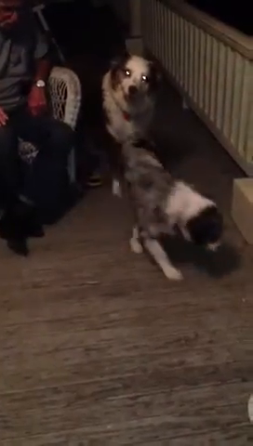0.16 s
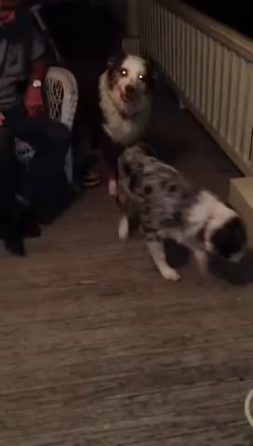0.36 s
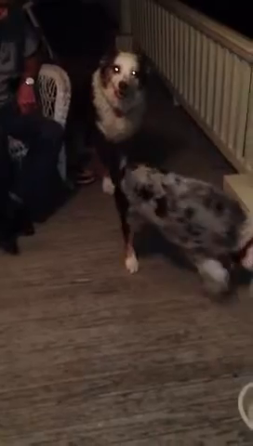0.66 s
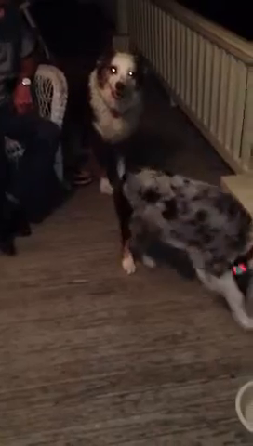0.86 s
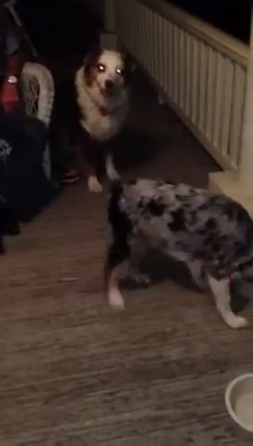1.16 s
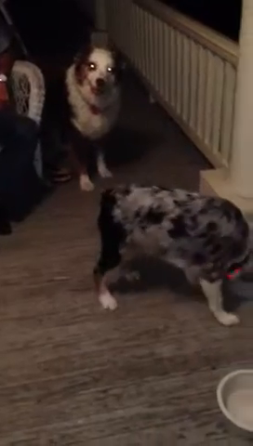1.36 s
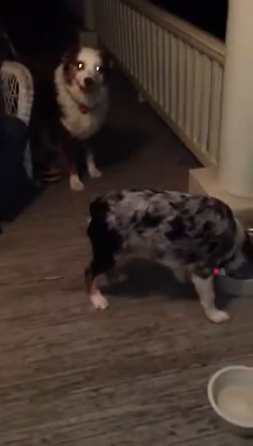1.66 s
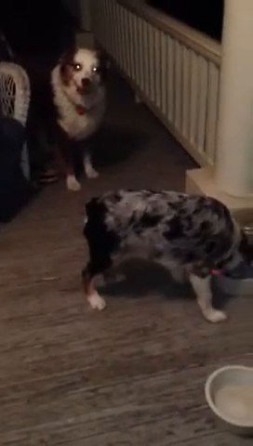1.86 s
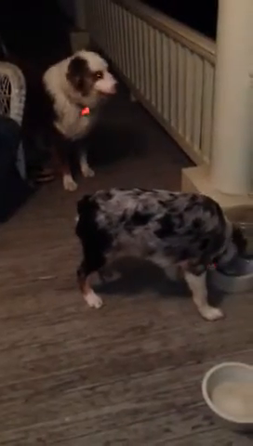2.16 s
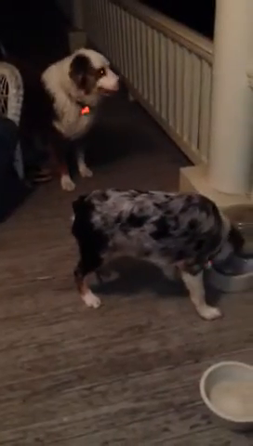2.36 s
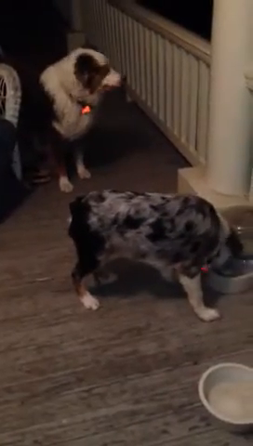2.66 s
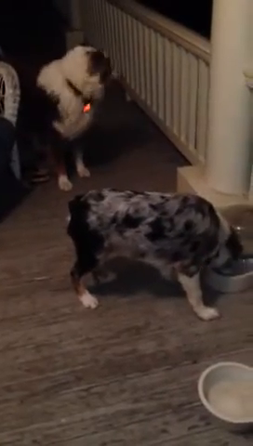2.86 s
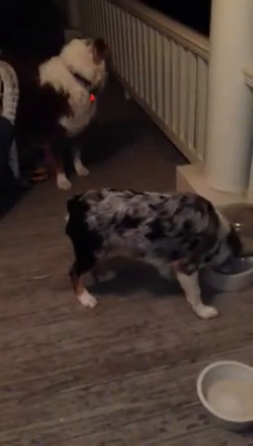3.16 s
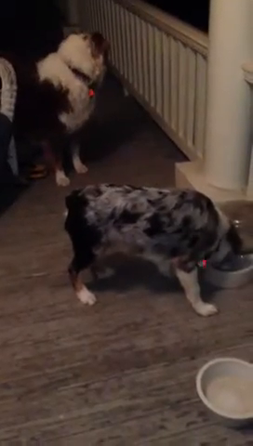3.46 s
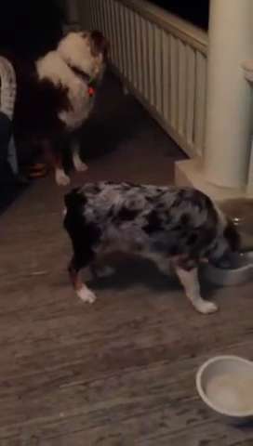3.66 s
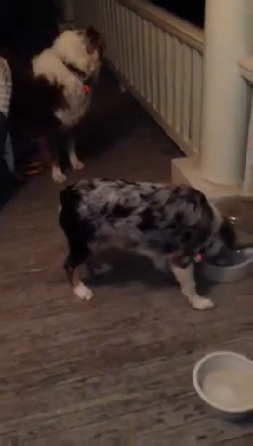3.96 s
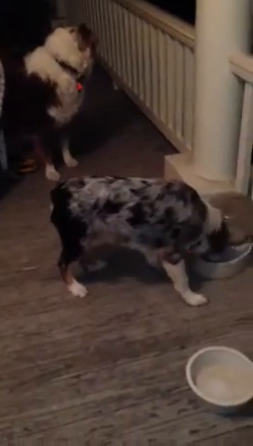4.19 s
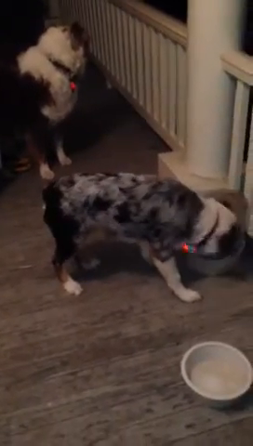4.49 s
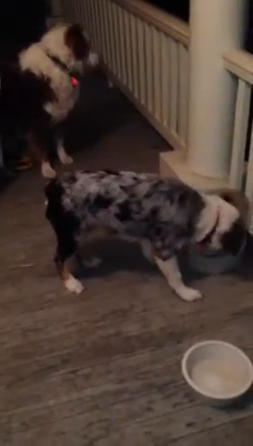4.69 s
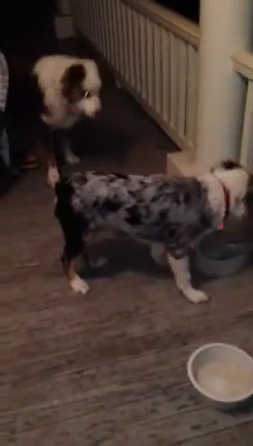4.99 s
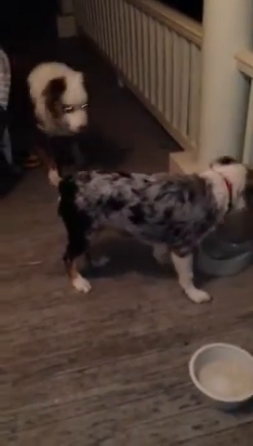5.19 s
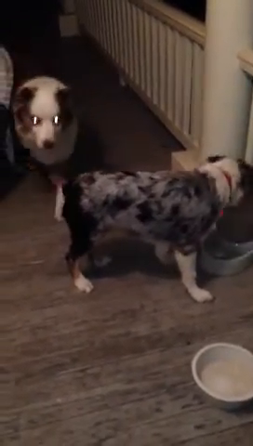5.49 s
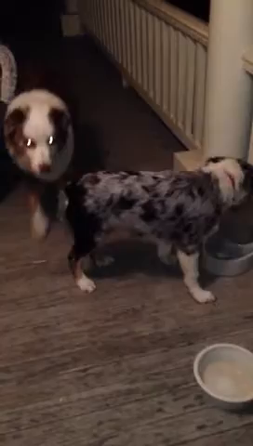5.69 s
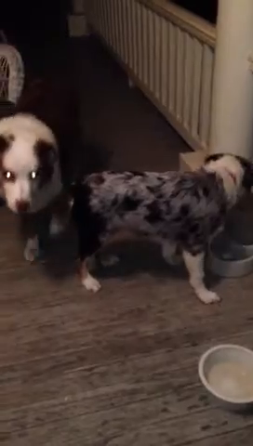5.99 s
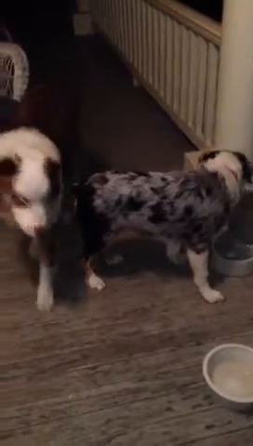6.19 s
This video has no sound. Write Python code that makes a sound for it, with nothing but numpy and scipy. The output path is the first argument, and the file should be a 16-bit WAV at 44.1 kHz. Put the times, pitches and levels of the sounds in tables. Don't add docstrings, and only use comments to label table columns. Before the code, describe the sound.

Crickets and katydids shimmer in the dark as dogs step on hollow planks, with light claw taps, soft scuffs and crackling metal tags.

```python
import sys
import numpy as np
from scipy import signal
from scipy.fft import rfft, irfft, next_fast_len
from scipy.io import wavfile
from scipy.ndimage import uniform_filter1d, map_coordinates

SR = 44100
rng = np.random.default_rng(int(sys.argv[2]) if len(sys.argv) > 2 else 0)


def linear_from_db(decibels):
    return 10 ** (np.asarray(decibels, float) / 20)


def file_out(sig):
    cols = np.atleast_2d(sig).T
    lim = np.clip(cols, -1, 1)
    pcm = np.round(lim * 32767).astype(np.int16)
    wavfile.write(sys.argv[1], SR, pcm)


N = 279594

# frequency in Hz, density in dB per Hz.
AIR_COLOUR = [(30, -20), (90, -16.5), (130, -1.5), (200, -4.5), (400, -10.5), (800, -13.5), (1500, -19.5),
              (2200, -12), (3600, -14.5), (5500, -8), (6400, -21.5), (10000, -25), (15500, -27)]
AIR_DB = -58
# frequency in Hz, width in Hz, level in dB.
MACHINE_LINES = [(172.9, 5.3, -66.5), (345, 13.3, -67.5), (251, 31, -71.5), (600.4, 19, -83)]

# carrier in Hz, spread in Hz, wing strokes per second, level in dB, swell in dB.
CHOIRS = [(2013, 40, 45, -72.5, 0), (2426, 120, 56, -67.5, 2), (2888, 170, 60, -69, 1.5),
          (4420, 200, 120, -69, 2.5), (5230, 130, 110, -62.5, 2), (5597, 170, 120, -61.5, 1)]
# time in seconds, effort in dB.
CHORUS_EFFORT = [(0.0, -5.5), (1.24, 0.5), (1.8, -6), (2.19, 6), (2.58, -4), (2.95, 6), (3.2, -3),
                 (4.34, 3.5), (4.63, -5.5), (5.7, 4), (6.34, 3)]
FOLLOW_HIGH, FOLLOW_MIDDLE, FOLLOW_LOW = 0.032, 0.95, 0.23
# carrier in Hz, wing strokes per second, level in dB, pitch drift as a share.
NEAR_CRICKETS = [(2780, 71, -75, 0.00062), (4420, 45, -73.5, 0.00198)]
# start in seconds, length in seconds, level in dB.
KATYDID_BURSTS = [(-0.1, 0.39, -72), (0.356, 0.17, -65), (0.77, 0.49, -67), (1.2, 0.61, -73),
                  (2.376, 0.39, -62.5), (3.28, 0.52, -63.5), (4.05, 0.44, -72), (4.59, 0.49, -62.5),
                  (5.58, 0.35, -70), (6.104, 0.69, -66)]
BURST_EDGE, KATYDID_REST_DB = 0.32, -75.5
# frequency in Hz, density in dB per Hz.
WING_COLOUR = [(5500, -30), (7000, -9), (8000, -2), (9000, 0), (10500, -3), (11800, -12), (13500, -24),
               (16000, -34)]
# start in seconds, length in seconds, carrier in Hz, level in dB.
TRILLS = [
    (0.84, 0.18, 4770, -67),
    (2.1, 0.25, 4340, -67),
    (2.72, 0.26, 4700, -63),
    (3.83, 0.13, 4400, -66),
]

# time in seconds, crack in dB, ring in dB, struck spot from 0 low to 2 high.
TAG_TOUCHES = [(0.0446, -41, -51, 0.54), (0.339, -52, -48, 0.38), (0.398, -35, -29, 1),
               (0.4034, -24, -46, 0.6), (0.4138, -29, -37, 1), (0.6668, -49, -48, 1),
               (0.9681, -46, -55, .75), (1.257, -41, -52, .15), (1.318, -41, -44, .4),
               (2.173, -51, -43, .95), (2.4782, -31, -37, 0.63), (2.6287, -44, -43, 0.67),
               (2.66, -41, -46, 1.2), (2.8737, -33, -46, 1.5), (2.976, -50, -50, .1),
               (3.033, -42, -40.5, 1), (3.2744, -45, -46, 0.43), (3.3705, -32, -43, 1.3),
               (3.4599, -40, -51, .35), (3.5062, -26.5, -42, 0.66), (3.6464, -50, -40, .05),
               (3.7057, -27.5, -47, 1.05), (3.9039, -52, -52, .9), (4.011, -47, -42, .05),
               (4.4267, -42, -51, .35), (4.479, -52, -41.5, .05), (4.929, -52, -47, 1),
               (5.2055, -45, -42, 1.23), (5.625, -53, -47, .3)]
# the same four, then ring time (t60) in seconds.
TAG_CLASH = [(3.182, -43, -48, .05, 0.007), (3.1876, -34, -44, 1.2, .02), (3.191, -28, -27.5, 2, 0.0086),
             (3.1911, -29, -21, 0.39, 0.0083), (3.1974, -35, -38, 1.1, 0.011),
             (3.1972, -35, -39, .45, 0.0055), (3.2064, -43, -53, 1.9, .014), (4.4795, -60, -48.5, 2, 0.05),
             (4.428, -62, -59, .05, 0.059)]
# frequency in Hz, level in dB.
TAG_MODES = [
    [(6740, 8), (7080, -1)],
    [(8300, -23), (9600, 4), (10400, -0.5)],
    [(13280, 4), (14130, 5), (14800, -25)],
]
TAG_RING_S, SPOT_DB = 0.0073, 14

# time in seconds, plank in dB, pad thump in dB,
# claw pitch in Hz, claw in dB.
STEPS = [(0.155, -54.5, -55, 1190, -79), (0.174, -52, -65, 1180, -59.5), (0.478, -66, -57, 2000, -67),
         (0.685, -40.5, -45, 1540, -65), (0.727, -32.5, -49, 824, -54), (0.741, -38.5, -42.5, 1660, -55),
         (0.751, -38.5, -52, 616, -46), (0.761, -42, -58, 940, -60), (0.807, -41, -44, 910, -49.5),
         (0.829, -54, -47.5, 860, -53), (1.188, -52, -50, 905, -45.5), (1.258, -53, -55.5, 950, -62),
         (1.895, -20, -40, 963, -40.5), (1.909, -34, -51, 617, -41.5), (1.944, -42, -74, 563, -48.5),
         (1.987, -54, -74, 1070, -58.5), (2.114, -37, -58.5, 880, -62), (2.128, -45, -61, 450, -60.5),
         (2.16, -49.5, -55.5, 1070, -67)]
# time in seconds, strength in dB, claw pitch in Hz,
# weight on the pad from 0 to 1.
SHIFTS = [(1.723, -66, 1160, 0.3), (2.302, -68, 934, .1), (2.717, -66, 2110, 0.06), (3.022, -61, 616, 0.3),
          (3.032, -62.5, 800, 0.3), (3.371, -59, 2800, 0.17), (3.504, -61, 2400, 0.44),
          (3.758, -64.5, 1270, 0.2), (3.964, -66, 780, 0.7), (4.083, -67, 810, 0.95),
          (4.175, -62.5, 2300, 1), (4.261, -55.5, 890, 0.96), (4.476, -66.5, 1510, 1),
          (4.625, -68.5, 1180, 1), (4.928, -72, 2040, 0.4), (5.5, -67.5, 1200, 0.05),
          (5.862, -54, 1090, 0.42), (6.32, -56.5, 1040, .4)]
PLANK_OVER_DB, PLANK_LOSS_DB = 13, 26
PAD_OVER_DB, PAD_GAIN_DB = -12.5, 22
CONTACT_S, CONTACT_GROWS = 0.007, 0.12
PAD_LAG = 0.9
# frequency in Hz, width in Hz, level in dB.
DECK_MODES = [(36, 25, -14.5), (149, 29, -1.5), (171.3, 19, 8), (298, 22, -2)]
# frequency in Hz, width in Hz, level in dB.
PLANK_MODES = [(362, 33, 4), (427, 29, 4.5), (580, 115, -3), (733, 66, 2), (850, 44, -14), (1070, 100, -34),
               (1430, 70, -18), (1587, 140, -70), (2040, 24, -81)]
# start in seconds, length in seconds, level in dB, centre in Hz.
SCUFFS = [(0.678, 0.094, -47, 2200), (0.732, 0.035, -38, 1300), (.808, 0.059, -55.5, 2250),
          (1.891, 0.029, -50, 2280), (2.32, 0.026, -56, 2000), (3.371, 0.016, -48, 2700),
          (3.385, .03, -57.5, 2500), (3.19, .006, -49.5, 5500), (3.196, 0.0054, -54, 5300),
          (4.172, 0.038, -54.5, 1990), (4.262, 0.023, -47, 1260), (5.235, 0.098, -55, 2500),
          (5.265, 0.037, -53, 3870), (0.732, 0.019, -43, 2830), (0.739, 0.0098, -70, 4500),
          (4.47, 0.031, -54.5, 1210), (2.0, 0.033, -57, 2500), (1.183, 0.031, -51.5, 2250),
          (5.611, 0.042, -55.5, 3060), (5.866, 0.022, -53, 2800), (6.002, 0.16, -58.5, 2270),
          (6.073, 0.1, -64, 6270), (6.104, .006, -71, 7000), (6.318, 0.019, -48, 2450)]

# frequency in Hz, t60 in seconds.
PORCH_DECAY = [(150, 0.24), (600, 0.32), (3000, 0.086), (12000, 0.096)]


def unit(x):
    return x / np.sqrt(np.mean(x ** 2) + 1e-20)


def along(points, hz):
    f, v = np.transpose(points)
    return np.interp(np.log(hz + 1), np.log(f + 1), v)


def curves(rows):
    s, *cols = np.transpose(rows)
    return [np.interp(np.arange(N) / SR, s, c) for c in cols]


def wobble(rate):
    return map_coordinates(rng.standard_normal(1000), [np.arange(N) * rate / SR])


def swell(s, length):
    t = np.arange(N) / SR
    return np.clip(np.minimum(t - s, s + length - t) / (BURST_EDGE * length), 0, 1)


def filtered(x, response):
    m = next_fast_len(len(x) + SR // 2)
    return irfft(rfft(x, m) * response(np.fft.rfftfreq(m, 1 / SR)), m)[:len(x)]


def resonances(modes):
    def response(f):
        total = 0
        for k, (hz, width, db) in enumerate(modes):
            total = total + (-1) ** k * linear_from_db(db) * 1j * f * width / (hz * hz - f * f + 1j * f * width)
        return total
    return response


def hiss(response):
    return unit(filtered(rng.standard_normal(N), response))


def night():
    drift_db = 0.4 * wobble(4)
    out = linear_from_db(AIR_DB + drift_db) * hiss(lambda f: linear_from_db(along(AIR_COLOUR, f)))
    for hz, width_hz, db in MACHINE_LINES:
        out += linear_from_db(db) * hiss(resonances([(hz, width_hz, 0)]))
    return out


def singer(hz, strokes, drift, depth):
    tone = 2 * np.pi * np.cumsum(hz * (1 + drift * wobble(25))) / SR
    stroke = 2 * np.pi * (np.cumsum(strokes * (1 + 0.02074 * wobble(3))) / SR + rng.random())
    return np.sin(tone) * (1 + depth * np.cos(stroke))


def choirs(count=9):
    effort_db, = curves(CHORUS_EFFORT)
    out = np.zeros(N)
    for hz, spread_hz, strokes, db, swell_db in CHOIRS:
        voices = np.zeros(N)
        for u in np.linspace(-1, 1, count):
            voices += singer(hz + spread_hz * u, strokes * (1 + 0.2 * u), drift=0.012, depth=0.99)
        follow = FOLLOW_HIGH if hz > 4900 else FOLLOW_MIDDLE if hz > 3600 else FOLLOW_LOW
        out += linear_from_db(db + swell_db * wobble(11) + follow * effort_db) * unit(voices)
    return out


def near_crickets():
    out = np.zeros(N)
    for hz, strokes, db, drift in NEAR_CRICKETS:
        out += linear_from_db(db + 4.0 * wobble(6.4)) * unit(singer(hz, strokes, drift, depth=0.37))
    return out


def katydid():
    rasp = hiss(lambda f: linear_from_db(along(WING_COLOUR, f))) * linear_from_db(1.9 * wobble(70))
    bursts = sum(linear_from_db(db) * swell(s, length) for s, length, db in KATYDID_BURSTS)
    return linear_from_db(-3.5) * (bursts + linear_from_db(KATYDID_REST_DB)) * unit(rasp)


def trills():
    out = np.zeros(N)
    for s, length, hz, db in TRILLS:
        out += linear_from_db(db) * swell(s, length) * singer(hz, 40, drift=0.0015, depth=0.4)
    return out


def tags():
    out, t = np.zeros(N + SR), np.arange(SR // 4) / SR
    damped = [(*row, TAG_RING_S) for row in TAG_TOUCHES]
    for s, crack_db, top_db, spot, ring_s in damped + TAG_CLASH:
        luck, rough = rng.standard_normal((3, 3)), rng.standard_normal((4, len(t)))
        crack = filtered(rough[3] * linear_from_db(-60 * t / 0.0084), resonances([(8100, 10000, 0)]))
        x = linear_from_db(crack_db - 3.0) * crack
        fade = linear_from_db(-60 * t / np.clip(ring_s, 0.004, 0.3))
        group_db = top_db - SPOT_DB * np.abs(np.arange(3) - spot)
        for group, db, row, noise in zip(TAG_MODES, group_db, luck, rough):
            tones = np.zeros(len(t))
            for (hz, level_db), u in zip(group, row):
                tones += linear_from_db(level_db + 1.1 * u) * np.sin(2 * np.pi * hz * (1 + 0.0052 * u) * t)
            middle_hz = group[1][0]
            rattle = filtered(noise, resonances([(middle_hz, 0.23 * middle_hz, 14)]))
            x += linear_from_db(db) * fade * (tones + rattle * linear_from_db(-60 * t / 0.0093))
        out[round(s * SR):][:len(t)] += x * (1 - np.exp(-t / 0.0011))
    return out[:N]


def weight_shifts():
    rows = []
    for s, db, claw_hz, weight in SHIFTS:
        plank_db = db + PLANK_OVER_DB - PLANK_LOSS_DB * weight
        pad_db = db + PAD_OVER_DB + PAD_GAIN_DB * weight
        rows.append((s, plank_db, pad_db, claw_hz, db))
    return rows


def paws():
    out, t = np.zeros(N + SR), np.arange(SR // 3) / SR
    blow = 3.34 * t / 0.00027 * np.exp(-t / 0.00015)
    for s, plank_db, pad_db, claw_hz, claw_db in STEPS + weight_shifts():
        hard_db = max(plank_db, claw_db + 14) + 24.5
        contact_s = np.clip(CONTACT_S * linear_from_db(-CONTACT_GROWS * hard_db), 0.001, 0.1)
        shape = np.exp(-t / contact_s) * (1 - np.exp(-t / (0.55 * contact_s)))
        push = rng.standard_normal((3, len(t))) * shape
        push += blow * linear_from_db(0.5 * hard_db)
        push[2] += 0.64 * blow
        lag = round(PAD_LAG * contact_s * SR)
        push[1] = np.pad(push[1], (lag, 0))[:len(t)]
        claw_modes = [(claw_hz, 0.1 * claw_hz * linear_from_db(-0.3 * hard_db), 0),
                      (2.1 * claw_hz, 0.17 * claw_hz, -8),
                      (3.2 * claw_hz, 0.3 * claw_hz, -16)]
        plank = filtered(push[0], resonances(PLANK_MODES))
        pad = filtered(push[1], resonances(DECK_MODES))
        claw = filtered(push[2], resonances(claw_modes))
        dull_hz = 1600 * linear_from_db(0.27 * (plank_db + 4.5))
        plank = filtered(plank, lambda f: 1 / (1 + 1j * f / dull_hz) ** 2)
        parts = [(plank_db - 1.5, plank), (pad_db + 8.5, pad), (claw_db + 14.5, claw)]
        step = sum(linear_from_db(db) * part / np.abs(part).max() for db, part in parts)
        out[round((s - 0.0006) * SR):][:len(t)] += step
    return out[:N]


def scuffs():
    out = np.zeros(N + SR)
    for s, length, db, hz in SCUFFS:
        u = np.arange(SR // 4) / SR / length
        grit_db = 24 * uniform_filter1d(rng.standard_normal(len(u)), size=64)
        grain = rng.standard_normal(len(u)) * linear_from_db(grit_db)
        body = resonances([(hz, 1.2 * hz, 0)])
        rush = filtered(grain / np.std(grain), lambda f: body(f) / (1 + 1j * f / (2.34 * hz)) ** 4)
        out[round(s * SR):][:len(u)] += linear_from_db(db + 10.0) * rush * np.minimum(u / 0.13, 1) * np.exp(-u ** 3)
    return out[:N]


def porch(x, delay_s=0.0054):
    hz, t, z = signal.stft(rng.standard_normal(SR // 2), SR, nperseg=256)
    fade = linear_from_db(-60 * t / along(PORCH_DECAY, hz)[:, None])
    tail = signal.istft(z * fade, SR, nperseg=256)[1]
    late = np.pad(x, (round(delay_s * SR), 0))
    return signal.fftconvolve(late, tail / np.linalg.norm(tail))[:N]


def scene():
    far = night() + choirs() + near_crickets() + katydid() + trills()
    metal = tags()
    feet = paws() + scuffs()
    mono = far + feet + metal + linear_from_db(-12) * porch(feet) + linear_from_db(-6.5) * porch(metal)
    return np.array([mono, mono])


def roll_off(x):
    return signal.sosfilt(signal.butter(12, 15470, fs=SR, output="sos"), x)


def record(dry):
    cut = filtered(dry[0], lambda f: (1j * f / (90 + 1j * f)) ** 2 * (f < 15500))
    return roll_off(np.array([cut, cut]))


dry = scene()
out = record(dry)
file_out(out)
```